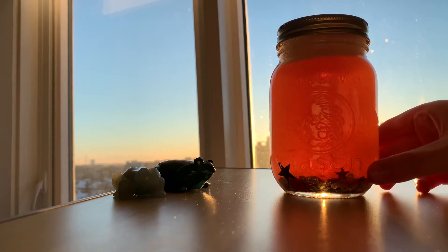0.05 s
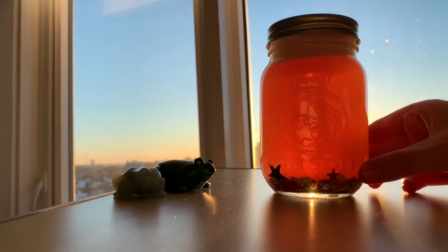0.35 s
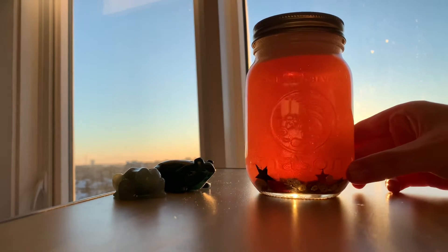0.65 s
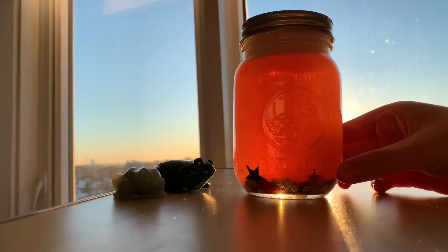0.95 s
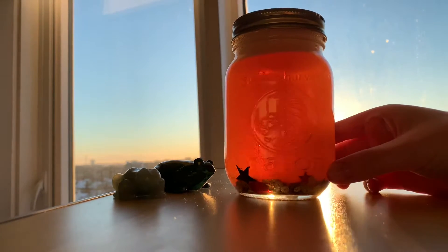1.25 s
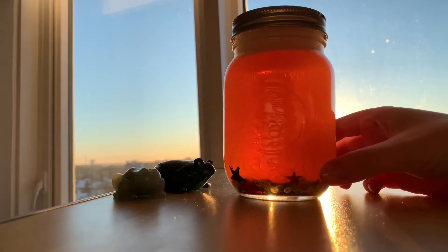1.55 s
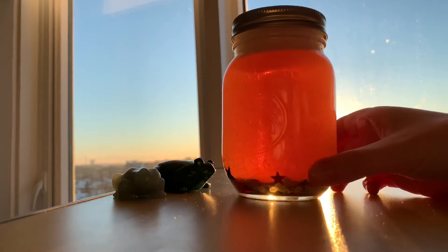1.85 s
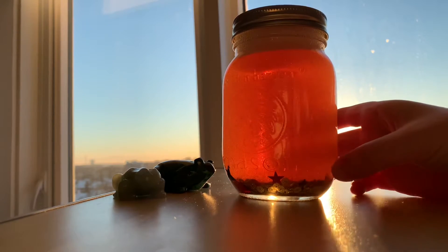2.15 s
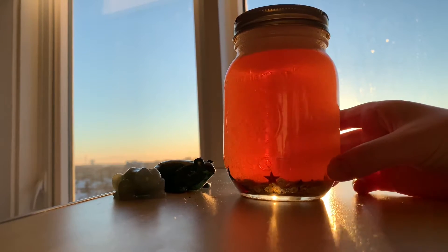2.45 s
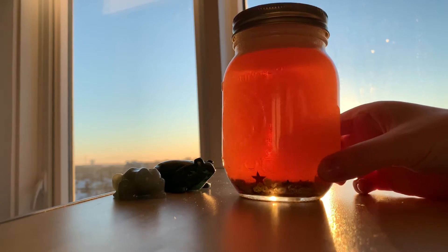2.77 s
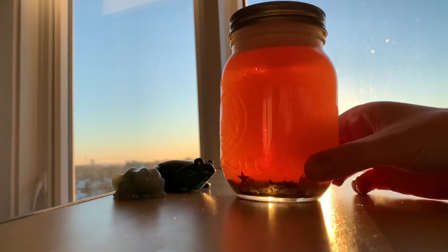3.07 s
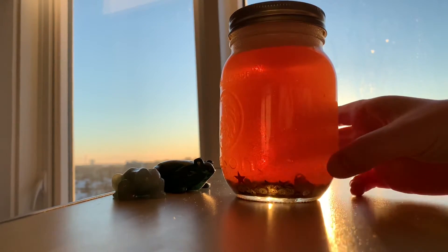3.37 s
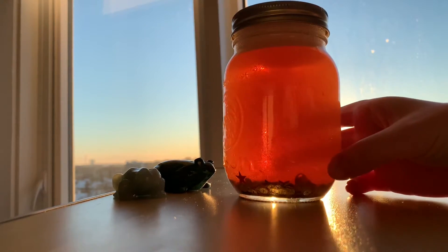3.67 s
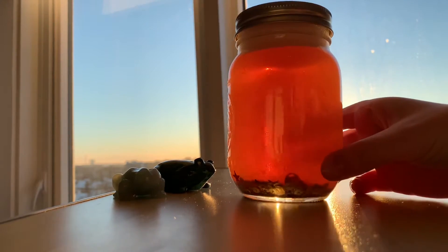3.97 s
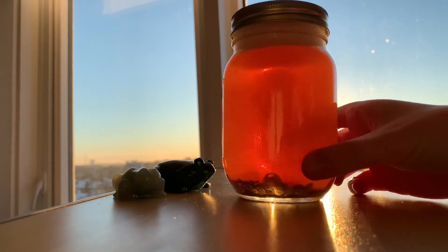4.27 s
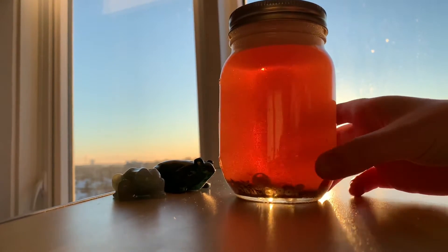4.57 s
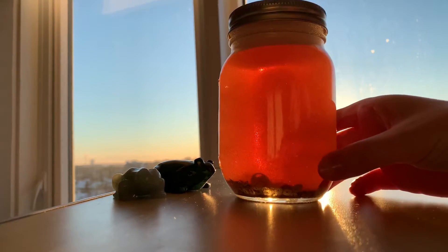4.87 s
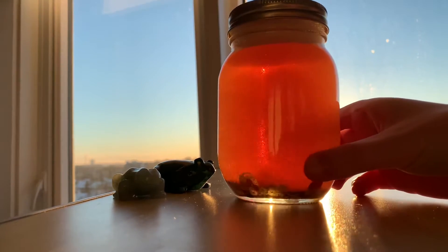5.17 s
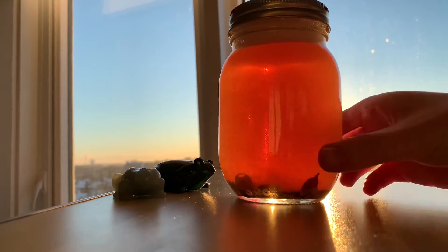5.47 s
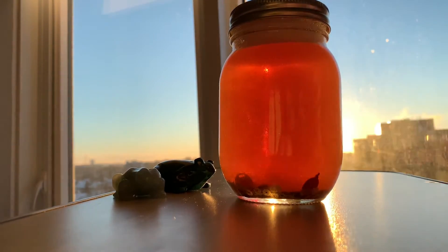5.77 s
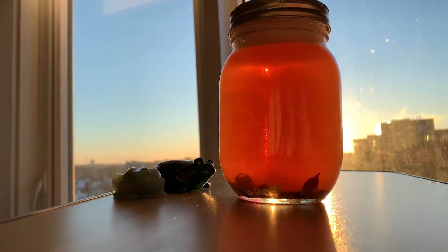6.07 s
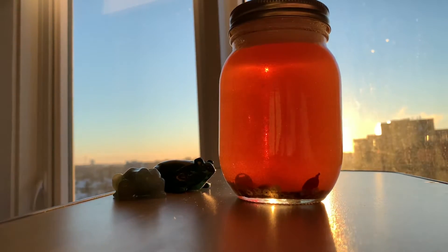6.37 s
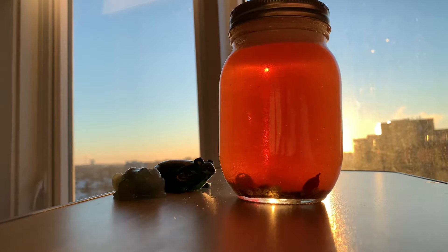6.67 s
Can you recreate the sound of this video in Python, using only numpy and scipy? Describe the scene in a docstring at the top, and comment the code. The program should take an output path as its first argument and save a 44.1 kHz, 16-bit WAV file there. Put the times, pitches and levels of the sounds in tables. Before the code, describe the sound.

Close by in a small, quiet room, the base of a full glass jar scrapes round on a wooden tabletop. It moves in several short turns with pauses between, each a gritty, uneven grinding full of little knocks, low thuds and short groans. One soft finger tap clinks on the glass. After the last turn come a few dry ticks and a faint rustle of sleeve over low room rumble.

```python
"""A full glass jar is turned by hand on a wooden table, in several short goes, in a small room.
Its base grinds in tiny slips, sticks and jumps, and now and then judders; the table top rings and
thuds under it. The fingers tap the glass once. Thin ticks sound here and there; more of them and a
faint sleeve rustle follow as the hand lets go, over a low room rumble and hiss."""
import sys
import numpy as np
from scipy import signal
from scipy.fft import rfft, irfft
from scipy.io import wavfile
from scipy.ndimage import uniform_filter1d

SR = 44100
rng = np.random.default_rng(int(sys.argv[2]) if len(sys.argv) > 2 else 0)


def put_to_file(sound):
    """Save the sound as 16-bit audio at rate SR, in the file named by the first command-line argument."""
    columns = np.atleast_2d(sound).T  # one column per channel
    safe = np.clip(columns, -1, 1)
    whole_steps = np.round(safe * 32767)
    wavfile.write(sys.argv[1], SR, whole_steps.astype(np.int16))


N = 296596
TIME = np.arange(N) / SR
PULSE_N = 32768
PULSE_TIME = np.arange(PULSE_N) / SR
FREQ = np.fft.rfftfreq(PULSE_N, 1 / SR)


def grinding(knock, grit, thud, knock_db=-51, grit_db=-71.5, thud_db=-49):
    """The base scrapes round: the same slips knock the wood, crackle and shake the table."""
    push = hand_push()
    sliding = push * sticking()
    knock_gain = undb(knock_db) * sliding
    grit_gain = undb(grit_db + 2 * walk(rate_hz=25)) * sliding ** 1.25
    thud_gain = undb(thud_db) * push ** 0.76
    drive = slips(rate_hz=600, scatter_db=21, patchy_db=2, patch_hz=60)
    layers = (knock_gain, knock), (grit_gain, grit), (thud_gain, thud)
    scrape = sum(gain * steady(ring(drive, pulse)) for gain, pulse in layers)
    return scrape + sliding * grip_resonances(drive)


# grinding, one curve per turn: t/s, level/dB
TURN_CURVES = [
    [(0.13, -83), (0.164, -47.5), (0.4, -49), (0.468, -38), (0.48, -43.5), (0.624, -41.5), (0.654, -49.5),
     (0.898, -46.5), (1.12, -53.5), (1.3, -61)],
    [(1.3, -65), (1.342, -57.5), (1.402, -56.5), (1.7, -53), (1.748, -46.5), (1.9, -63), (2.02, -77)],
    [(2.52, -66), (2.558, -57.5), (2.88, -47), (2.912, -56), (2.922, -49), (3.082, -54), (3.1, -41),
     (3.155, -64.5), (3.2, -80)],
    [(3.56, -89), (3.595, -59.5), (3.87, -48), (3.992, -47.5), (4.022, -53), (4.058, -45.5), (4.228, -51),
     (4.256, -44.5), (4.36, -44.5), (4.41, -59.5), (4.48, -77)],
    [(4.81, -101), (4.834, -64.5), (4.884, -46), (4.94, -50), (5.184, -50), (5.236, -42), (5.266, -57.5),
     (5.426, -73), (5.44, -98)],
]
# short nudges: t/s, level/dB
NUDGE_PEAKS = [(2.285, -54), (2.374, -52.5), (2.461, -54.5), (3.185, -71)]
# creep under the resting hand: t/s, level/dB
CREEP_PEAKS = [(0.1, -74), (2.13, -76.5), (3.22, -78.5), (4.47, -86)]

def hand_push(usual_db=-50):
    """How hard the hand grinds the base on the wood, as a gain: 1 at a usual push."""
    gain = sum(undb(np.interp(TIME, *np.transpose(turn), left=-np.inf, right=-np.inf))
               for turn in TURN_CURVES)
    for peaks, rise_s, fall_s in ((NUDGE_PEAKS, 0.027, 0.036), (CREEP_PEAKS, 0.085, 0.085)):
        for at_s, db in peaks:
            width_s = np.where(TIME < at_s, rise_s, fall_s)
            gain = gain + undb(db) * np.exp(-((TIME - at_s) / width_s) ** 2)
    return uniform_filter1d(gain, size=256) / undb(usual_db) + 1e-9


# base holds fast: t/s, level/dB
STALL_DIPS = [(0.212, -7.5), (0.265, -7), (0.338, -2), (0.388, -3), (0.725, -5), (0.885, -4), (1.017, -7.5),
              (1.406, -4), (1.452, -5), (1.573, -5), (2.852, -3), (3.635, -7), (3.83, -10), (4.25, -8),
              (4.999, -4.5), (5.183, -3.5)]

def sticking(depth=0.5, stick_s=0.0047, smooth_s=0.0054, stall_s=0.01):
    """The base sticks before each jolt, and longer in a stall: the grinding gain drops."""
    jolt_s = np.transpose(JOLT_HITS)[0]
    upcoming = np.minimum(np.searchsorted(jolt_s, TIME), len(jolt_s) - 1)
    wait_s = jolt_s[upcoming] - TIME
    caught = 1 - depth * np.exp(-(wait_s / stick_s) ** 2)
    stall_db = sum(db * np.exp(-((TIME - at_s) / stall_s) ** 2) for at_s, db in STALL_DIPS)
    return undb(stall_db) * uniform_filter1d(caught, int(smooth_s * SR))


# jar and table resonances: start/s, end/s, f/Hz, width/Hz, level/dB, L-R/dB
GRIP_MODES = [(0.1, 1.95, 225, 75, -64, 4.5), (0.043, 0.96, 940, 9.7, -64, 0.5),
              (0.88, 1.08, 3780, 330, -81, -1.5), (0.2, 3, 4330, 150, -92, -1.5),
              (2.53, 3.3, 2960, 270, -83, 7), (2.5, 3.25, 495, 27, -61, 4),
              (3.73, 5.05, 2080, 160, -75, -4), (3.75, 4.5, 3850, 300, -81, -3.5),
              (4.72, 5.33, 662, 28, -57.5, 2), (4.76, 5.25, 514, 15, -56.5, 4),
              (2.6, 3.25, 668, 11.5, -60, 1), (3.7, 5.4, 1400, 35, -64.5, -3),
              (0.18, 2.3, 1720, 70, -74, 1), (0.33, 0.78, 1565, 30, -70.5, 3)]

def grip_resonances(drive, fade_s=0.14, waver_db=1.5):
    """As the grip and the jar's place change, the slips ring different, wavering resonances."""
    out = np.zeros((2, N))
    for start_s, end_s, hz, width_hz, db, pan_db in GRIP_MODES:
        q = hz / width_hz
        band = signal.lfilter(*signal.iirpeak(hz, q / 2, fs=SR), drive)
        tone = unit(signal.lfilter(*signal.iirpeak(hz, q, fs=SR), band))
        gate = np.clip(np.minimum(TIME - start_s, end_s - TIME) / fade_s, 0, 1)
        out += panned(db, pan_db) * tone * gate * undb(waver_db * walk(rate_hz=14))
    return out


# jumps of the base: t/s, level/dB, grit re level/dB
JOLT_HITS = [(0.155, -43, -11), (0.241, -50.5, -8), (0.275, -58, -22), (0.309, -36.5, -17),
             (0.326, -38, -9.5), (0.347, -36.5, -14), (0.401, -40.5, -14), (0.446, -37, -12),
             (0.47, -42, -6), (0.502, -39.5, -7.5), (0.604, -36.5, -10), (0.613, -42, -15),
             (0.764, -46, -16), (0.803, -39.5, -16), (0.901, -35.5, -18), (1.028, -41, -15),
             (1.076, -44.5, -22), (1.105, -45, -31), (1.141, -49, -32), (1.183, -47, -30),
             (1.209, -61, -19), (1.25, -47.5, -24), (1.335, -44.5, -25), (1.358, -42.5, -12.5),
             (1.435, -53, -4), (1.465, -45.5, -11), (1.484, -44.5, -27), (1.503, -53, -8),
             (1.514, -48, -22), (1.547, -45, -18), (1.578, -48, -11), (1.622, -48, -19), (1.642, -47, -10),
             (1.669, -43.5, -10.5), (1.718, -41, -8), (1.752, -38.5, -7.5), (1.86, -41, -21),
             (1.925, -50, -27), (2.285, -42.5, -28), (2.366, -40, -20), (2.452, -41, -21),
             (2.548, -47.5, -26), (2.595, -46, -6), (2.642, -43.5, -21), (2.661, -38, -16),
             (2.723, -45, -25), (2.772, -36.5, -17), (2.795, -38, -22), (2.827, -41.5, -16),
             (2.863, -35, -12.5), (2.877, -42, -13), (2.923, -37, -20), (2.936, -36, -14),
             (2.956, -40, -20), (2.972, -38.5, -14.5), (3.008, -42, -24), (3.038, -38, -22),
             (3.095, -35.5, -23), (3.109, -42.5, -28), (3.181, -54.5, -27), (3.662, -41.5, -26),
             (3.725, -42, -15.5), (3.744, -46, -9), (3.783, -41, -27), (3.802, -45.5, -11),
             (3.921, -41, -17), (3.963, -36, -13.5), (3.983, -36, -12.5), (3.989, -31.5, -28),
             (4.009, -35.5, -11.5), (4.049, -31.5, -11.5), (4.08, -38, -12.5), (4.097, -36, -8.5),
             (4.114, -35.5, -24), (4.132, -38.5, -13.5), (4.179, -36.5, -13.5), (4.19, -35, -13),
             (4.24, -36, -20), (4.2587, -29, -20.5), (4.285, -43, -6), (4.301, -34.5, -16),
             (4.313, -24, -14.5), (4.3505, -26, -18.5), (4.877, -34.5, -12.5), (4.893, -36.5, -33),
             (4.947, -56, -17), (4.964, -48, -8), (5.018, -38, -16.5), (5.049, -41.5, -14),
             (5.079, -41.5, -14), (5.129, -48, -22), (5.163, -43.5, -16), (5.213, -38.5, -26),
             (5.231, -42.5, -17), (5.237, -38.5, -19)]

def jolts(jump, grit, thud, rebound_s=0.001447, rebound_gain=0.71):
    """The base catches hard and jumps, crushing grit; the rim lands again a moment later."""
    at_s, level_db, grit_db = np.transpose(JOLT_HITS)
    again_s = at_s + rebound_s * np.exp(0.1 * rng.standard_normal(len(at_s)))
    crushed = ring(grit, crunch(decay_s=0.002, spray=0.26))
    out = 0
    for pulse, trim_db in ((jump, -2), (crushed, grit_db - 2), (thud, -15)):
        sizes = undb(level_db + trim_db)
        landings = impulses(at_s, sizes) + impulses(again_s, rebound_gain * sizes)
        out = out + ring(landings, unit_peak(pulse))
    return out


# jar rocking as it slides: t/s, length/s, f/Hz, level/dB
JUDDER_BURSTS = [(0.425, 0.057, 320, -41), (0.533, 0.096, 340, -42), (0.956, 0.055, 219.5, -40),
                 (1.022, 0.056, 225, -41), (1.56, 0.095, 76.8, -43.5), (1.63, 0.068, 216, -41),
                 (1.722, 0.069, 231.3, -40.5), (1.814, 0.1, 71.5, -42.5), (3.978, 0.023, 661, -40.5),
                 (3.982, 0.034, 489, -38), (4.379, 0.039, 191.5, -40), (4.894, 0.032, 185.2, -34.5),
                 (5.131, 0.13, 65.1, -40.5), (5.237, 0.09, 67.6, -40.5)]

def judders(trim_db=-1, waver=0.0879, overtone_db=-16):
    """For a few cycles the slips fall in step with the rocking jar: a short, unsteady groan."""
    out = np.zeros(N)
    clock_s = np.cumsum(1 + waver * walk(rate_hz=120)) / SR
    for at_s, length_s, hz, db in JUDDER_BURSTS:
        now = (TIME > at_s) & (TIME < at_s + length_s)
        phase = 2 * np.pi * hz * clock_s[now]
        swell = np.sin(np.pi * (TIME[now] - at_s) / length_s)
        out[now] += undb(db + trim_db) * swell * (np.sin(phase) + undb(overtone_db) * np.sin(2 * phase))
    return ring(out, room(mid_db=-18, side_db=-7.5))


# table top modes: f/Hz, width/Hz, level/dB, L-R/dB
WOOD_MODES = [(176.5, 62, 11, -0.5), (338, 27.6, 9, 5), (370, 30, 6, -9.5), (443, 13, 8.5, -4.5),
              (485, 26.4, 10.5, 9), (516.3, 15, 9, -3), (585, 7.9, 3.5, -2.5), (659.9, 19.2, 15, 5),
              (774.5, 30, 1.5, 14), (816.5, 38, 3, 2), (928, 24, 12.5, 2), (1064, 22, -0.5, 9),
              (1100, 35, 1.5, -12), (1162, 55, 7.5, -5), (1239, 47, 8.5, 0), (1312, 55, 4.5, 0),
              (1395, 100, -4.5, -4), (1548, 44, 9.5, 2.5), (1802, 38, 7, 1.5), (2127, 52, 0, 5),
              (2496, 70, 0.5, -0.5), (2640, 110, 0, -1), (2910, 72, -5.5, 1), (3760, 200, 2, -7.5),
              (4350, 79, -3.5, -1.5), (6900, 150, -3.5, -1.5)]

def table_top(spectrum, space):
    """One contact pulse rings the wood's modes, then the room."""
    body = np.ones((2, len(FREQ)), complex)
    warped = np.tan(np.pi * FREQ / SR)
    for hz, width_hz, db, pan_db in WOOD_MODES:
        ratio = warped / np.tan(np.pi * hz / SR)
        loss = 1j * ratio * width_hz / hz
        body += panned(db, pan_db) * loss / (1 - ratio ** 2 + loss)
    return ring(irfft(body * rfft(response(spectrum))), space)


# glass-on-wood contact spectra: f/Hz, level/dB
KNOCK_SPECTRUM = [(120, -18.5), (220, -14.5), (290, -2.5), (400, 2), (700, -2), (1030, -11), (1450, -11.5),
                  (1750, -20), (2300, -29.5), (3200, -50), (6000, -63.5), (14000, -74.5)]
JUMP_SPECTRUM = [(120, -25.5), (220, -5), (400, -3.5), (700, 2), (1030, -7), (1450, -5), (1750, -17),
                 (2200, -16.5), (2700, -28.5), (3600, -32), (6000, -57.5), (14000, -73)]
GRIT_SPECTRUM = [(900, -35.5), (1700, 5.5), (2400, 5.5), (3400, 0), (4100, -8), (4700, -9.5), (5100, -17.5),
                 (7000, -16.5), (9000, -56), (16000, -76.5)]
THUD_SPECTRUM = [(35, -34.5), (65, 15), (95, 4), (130, -5.5), (190, 2), (245, 3.5), (310, -21), (500, -60),
                 (4000, -105)]

def base_contacts():
    """The table's responses to a slip's knock, a harder jump, grit and a low thud."""
    return (table_top(KNOCK_SPECTRUM, room(mid_db=-3.5, side_db=-4.5)),
            table_top(JUMP_SPECTRUM, room(mid_db=-6, side_db=-7)),
            table_top(GRIT_SPECTRUM, room(mid_db=-5, side_db=2.5)),
            table_top(THUD_SPECTRUM, room(mid_db=-9.5, side_db=-2.5)))


# finger on glass: f/Hz, level/dB
TOUCH_SPECTRUM = [(290, -50), (500, -10), (744, 2.5), (1060, -24), (1290, -1), (1700, -16), (1840, -5),
                  (2100, -12), (3500, -14), (4120, -14), (4600, -19), (7000, -42), (9100, -70),
                  (15400, -120)]
# glass modes: f/Hz, level/dB, t60/s
GLASS_MODES = [(1304, -5, 0.081), (1860, -18, 0.14), (2280, -21, 0.15), (2600, -21, 0.14),
               (3900, -12, 0.047)]

def finger_tap(at_s=3.243, touch_db=-52.5, clink_db=-56):
    """Shifting fingers tap the glass: a soft knock and a short clink."""
    glass = sum(undb(db) * np.sin(2 * np.pi * hz * PULSE_TIME) * decay(t60_s)
                for hz, db, t60_s in GLASS_MODES)
    touch = ring(response(TOUCH_SPECTRUM), room(mid_db=2.5, side_db=3))
    clink = ring(glass, room(mid_db=-11, side_db=-10))
    pulse = undb(touch_db) * unit_peak(touch) + undb(clink_db) * unit_peak(clink)
    return ring(impulses(np.array([at_s]), np.ones(1)), pulse)


# thin ticks: t/s, level/dB, L-R/dB, crackle decay/s, low shelf/dB
TICK_HITS = [(1.61, -42.5, -1, 0.0006, -8), (2.636, -56.5, -2, 0.00084, -2), (3.005, -64, 0, .0007, 0),
             (4.099, -43, 1, 0.0014, 0), (5.0295, -35.5, -1, 0.00065, -6), (5.7173, -52, 6, 0.001, 3.5),
             (5.8134, -59, 1, 0.0033, -2), (5.8456, -35, 3, 0.0014, 0), (5.85, -49, -4, .001, 0),
             (5.873, -60, -8, .005, 5), (5.907, -56, -1, 0.0018, 0), (5.973, -61, -5, .001, 7),
             (5.9856, -59, -15, .002, 2), (5.994, -55, -3, .002, -8), (6.0, -41, -2.5, 0.00096, 1.5),
             (6.03, -56, 0, 0.012, 5), (6.086, -57.5, -4, 0.00093, -3), (6.155, -64, -3, .003, 3),
             (6.1926, -62.5, -3, 0.0046, 9)]
# one snap: f/Hz, level/dB
TICK_SPECTRUM = [(1500, -30), (3000, -22), (4400, -10), (5350, -5.5), (6300, -14), (7000, -9), (7650, -9),
                 (8150, -3), (9000, 5), (10200, -4.5), (11200, 2.5), (12400, -2), (13400, -19), (14500, -5),
                 (16500, -18.5)]

def ticks(trim_db=1, shelf_hz=8000, left_lag_s=0.000227, pad=20):
    """Bright, dry snaps and crackles; they reach the two sides out of phase, the right one sooner."""
    hits = np.zeros((2, N))
    low_pass = signal.butter(4, shelf_hz, fs=SR, output="sos")
    for at_s, db, pan_db, decay_s, shelf_db in TICK_HITS:
        burst = np.pad(crunch(decay_s, spray=0.22)[0], (pad, 0))
        burst += (undb(shelf_db) - 1) * signal.sosfiltfilt(low_pass, burst, padtype=None)
        for ear, side in zip(hits, (1, -1)):
            start = round((at_s + side * left_lag_s / 2) * SR) - pad
            ear[start:start + len(burst)] += side * undb(db + trim_db + side * pan_db / 2) * burst
    snap = unit_peak(response(TICK_SPECTRUM))
    return ring(hits, ring(snap, room(mid_db=-14.5, side_db=-24)))


# rubbing cloth: f/Hz, level/dB
CLOTH_SPECTRUM = [(900, -25), (1700, -8.5), (2400, -1), (3500, -9.5), (5500, -7.5), (8000, -11.5),
                  (11000, -11), (16000, -23)]

def sleeve(at_s=5.7, attack_s=0.16, hold_s=0.34, release_s=0.1, level_db=-79.5):
    """The hand draws back: sleeve fibres catch and let go in uneven wisps."""
    corners_s = at_s + np.cumsum([0, attack_s, hold_s, release_s])
    fibres = slips(rate_hz=2200, scatter_db=27, patchy_db=2.5, patch_hz=87)
    rub = ring(fibres, response(CLOTH_SPECTRUM))
    cloth = unit(ring(rub, room(mid_db=-3, side_db=-1)))
    return cloth * undb(level_db) * np.interp(TIME, corners_s, [0, 1, 1, 0]) ** 2


# room decay: f/Hz, t60/s
ROOM_DECAY = [(150, 0.21), (530, 0.22), (1400, 0.16), (3700, 0.27), (12000, 0.084)]

def room(mid_db, side_db, wide_hz=450, build_s=0.00081):
    """Direct sound and a short diffuse tail in octave bands; the bass is alike at both ears."""
    noise = rfft(rng.standard_normal((2, PULSE_N)))
    noise[1] *= FREQ / np.hypot(FREQ, wide_hz)
    centres_hz = 62.5 * 2 ** np.arange(9)
    tail = 0
    for hz, share in zip(centres_hz, np.eye(len(centres_hz))):
        band = irfft(noise * along(np.c_[centres_hz, share], FREQ))
        fade = decay(along(ROOM_DECAY, hz)) * (1 - np.exp(-PULSE_TIME / build_s))
        tail = tail + band * fade / np.linalg.norm(fade)
    mid, side = tail
    return (PULSE_TIME == 0) + undb(mid_db) * mid + undb(side_db) * np.array([side, -side])


# background spectra: f/Hz, level/dB
RUMBLE_SPECTRUM = [(20, -37), (36, -5), (53, 8.5), (72, 4), (105, 2), (140, -6), (180, -1.5), (240, -20.5),
                   (320, -26.5), (480, -37.5), (1000, -74)]
HISS_SPECTRUM = [(300, 15.5), (700, 6.5), (1500, 0.5), (3000, -1.5), (5500, -7), (6900, -2), (8800, -18.5),
                 (9800, -3.5), (11200, -2.5), (12500, -1), (13600, -13), (16000, -22)]

def background(rumble_db=-55, side_db=-15, waver_db=1.5, hiss_db=-77):
    """A wavering low room rumble, nearly the same at both ears, and a smooth hiss."""
    mid, side = unit(ring(rng.standard_normal((2, N)), response(RUMBLE_SPECTRUM)))
    rumble = mid + undb(side_db) * np.array([side, -side])
    rumble *= undb(rumble_db - waver_db * walk(rate_hz=6.8))
    hiss = unit(ring(rng.standard_normal((2, N)), response(HISS_SPECTRUM)))
    return rumble + undb(hiss_db) * hiss


def slips(rate_hz, scatter_db, patchy_db, patch_hz):
    """Tiny stick-slips at random times and of uneven size, stronger on rough patches."""
    when, strength, polarity = rng.random((int(rate_hz * N / SR), 3)).T
    sizes = undb(scatter_db * strength) * np.sign(polarity - 0.5)
    return impulses(when * N / SR, sizes) * undb(patchy_db * walk(patch_hz))


def crunch(decay_s, spray):
    """A click that breaks up into a fading spray of smaller ones."""
    t = np.arange(2048) / SR
    return (t == 0) + spray * rng.standard_normal((2, len(t))) * np.exp(-t / decay_s)


def impulses(times_s, sizes):
    """A track with one impulse at each time."""
    return np.bincount(np.clip(np.round(times_s * SR).astype(int), 0, N - 1), sizes, N)


def walk(rate_hz):
    """Slewed random steps, rms 1."""
    hold = int(SR / rate_hz)
    steps = np.repeat(rng.standard_normal(N // hold + 1), hold)
    return unit(uniform_filter1d(steps, hold)[:N])


def response(spectrum):
    """Minimum-phase pulse with this spectrum."""
    cepstrum = irfft(np.log(undb(along(spectrum, FREQ))))
    cepstrum[1:PULSE_N // 2] *= 2
    cepstrum[PULSE_N // 2 + 1:] = 0
    return irfft(np.exp(rfft(cepstrum)))


def ring(x, pulse):
    """Convolve per channel, keeping the length."""
    x = np.atleast_2d(x)
    return signal.fftconvolve(x, np.atleast_2d(pulse), axes=1)[:, :x.shape[1]]


def along(points, hz):
    """Interpolate (f/Hz, value) points over log frequency."""
    f, value = np.transpose(points)
    return np.interp(np.log(np.maximum(hz, 1)), np.log(f), value)


def decay(t60_s):
    """Exponential fade, 60 dB per t60_s."""
    return np.exp(-np.log(1000) * PULSE_TIME / t60_s)


def steady(x, window_s=0.075):
    """Hold the running rms at 1, keeping the fine grain."""
    return x / np.sqrt(uniform_filter1d(np.mean(x ** 2, axis=0), int(window_s * SR)) + 1e-12)


def unit(x):
    """Scale to rms 1."""
    return x / np.sqrt(np.mean(x ** 2))


def unit_peak(x):
    """Scale to peak 1."""
    return x / np.abs(x).max()


def panned(db, pan_db):
    """Left and right gains, pan_db apart."""
    return undb(db + np.array([[pan_db], [-pan_db]]) / 2)


def undb(db):
    """Decibels to gain."""
    return 10 ** (np.asarray(db) / 20)


def scene():
    """The jar on the table, ticks, sleeve and background."""
    knock, jump, grit, thud = base_contacts()
    jar = grinding(knock, grit, thud) + jolts(jump, grit, thud) + judders() + finger_tap()
    return jar + ticks() + sleeve() + background()


def record(dry, top_hz=16500):
    """The nearby phone cuts the top treble."""
    return signal.sosfilt(signal.ellip(8, 0.2, 70, top_hz, fs=SR, output="sos"), dry)


dry = scene()
out = record(dry)
put_to_file(out)
```